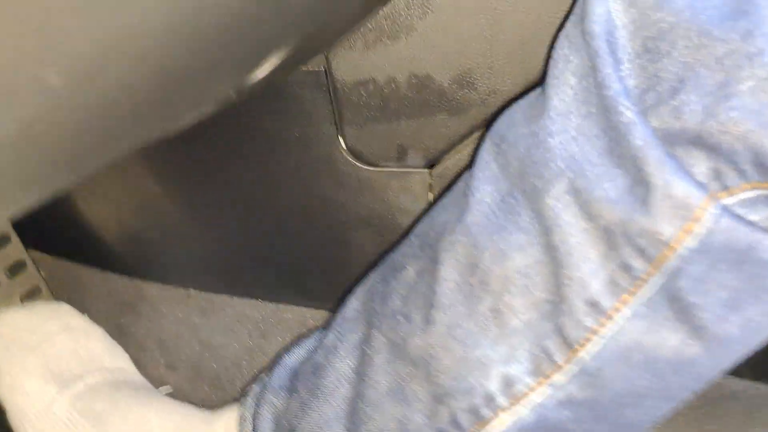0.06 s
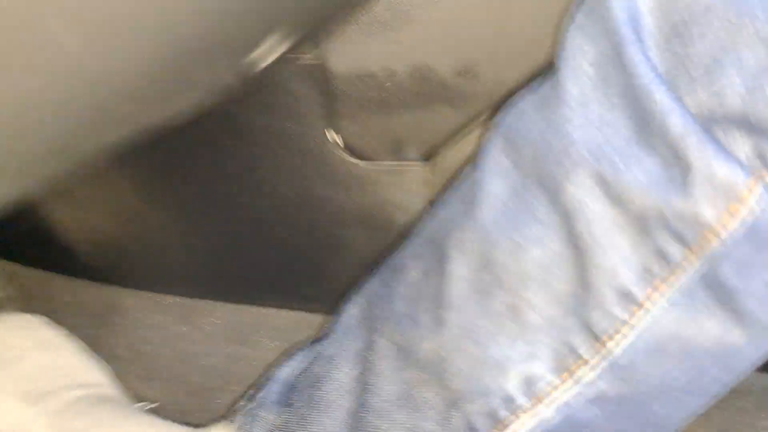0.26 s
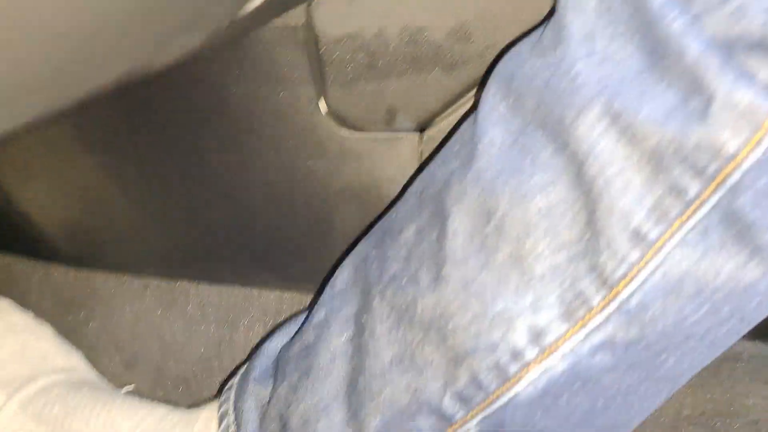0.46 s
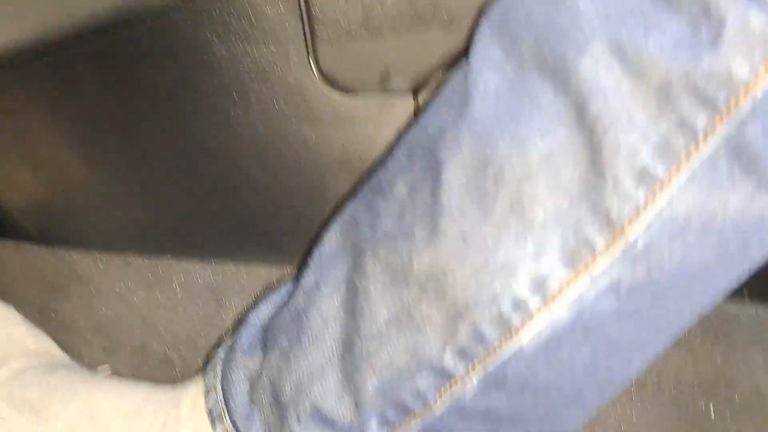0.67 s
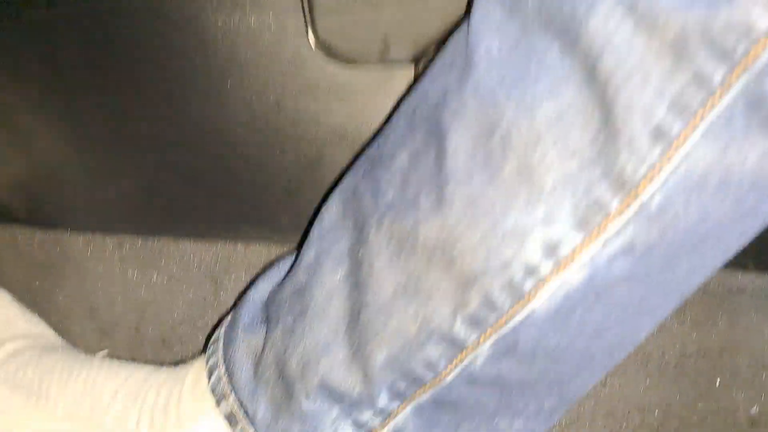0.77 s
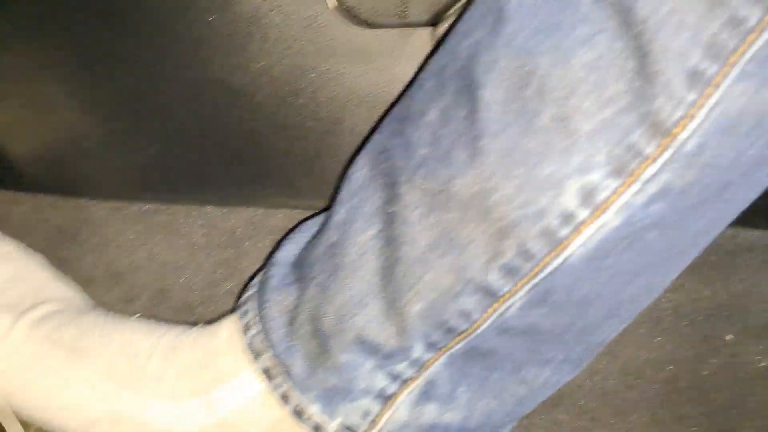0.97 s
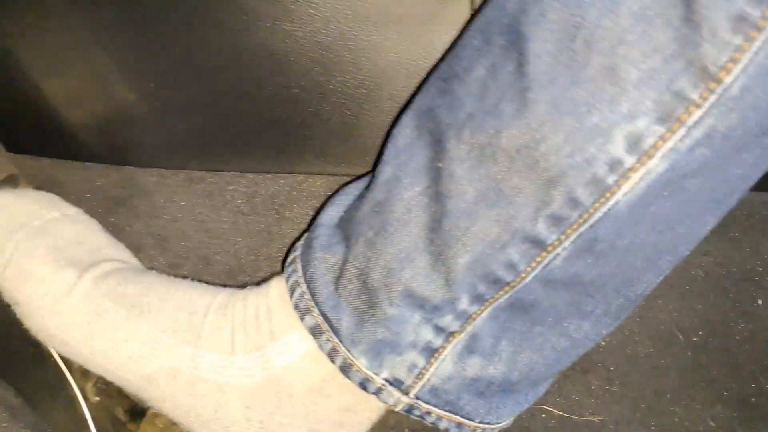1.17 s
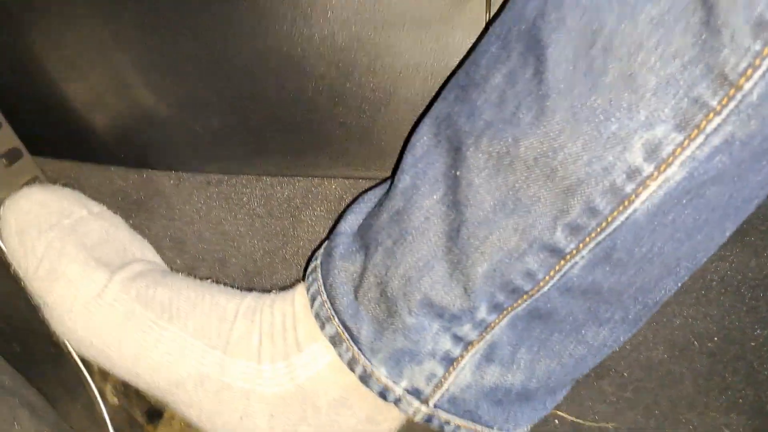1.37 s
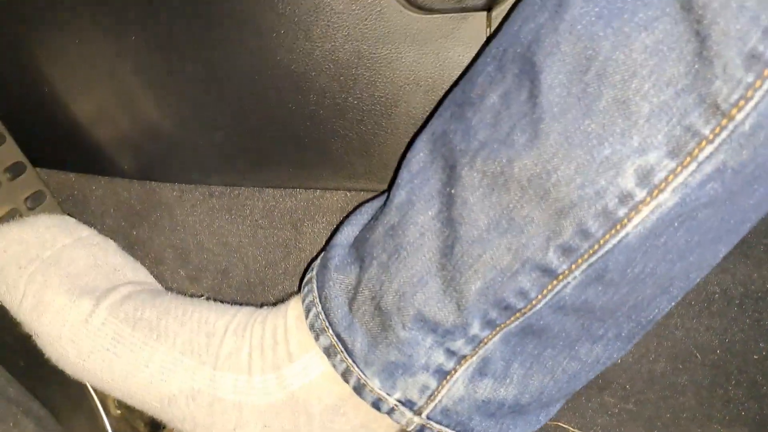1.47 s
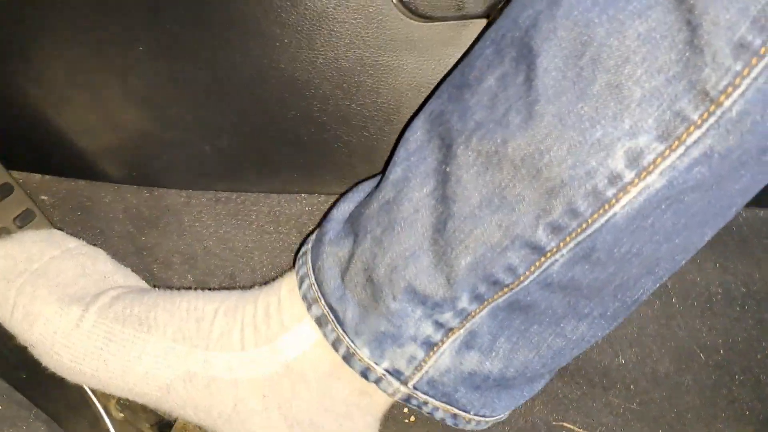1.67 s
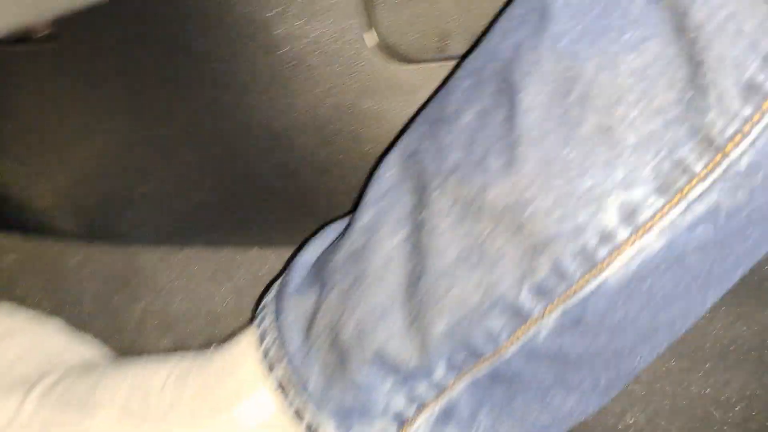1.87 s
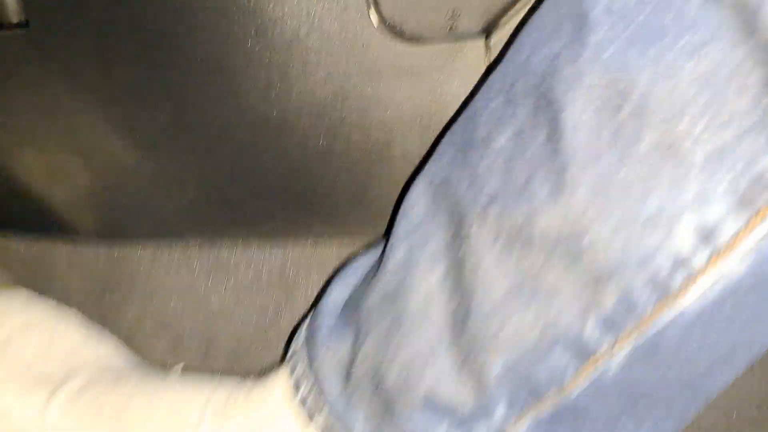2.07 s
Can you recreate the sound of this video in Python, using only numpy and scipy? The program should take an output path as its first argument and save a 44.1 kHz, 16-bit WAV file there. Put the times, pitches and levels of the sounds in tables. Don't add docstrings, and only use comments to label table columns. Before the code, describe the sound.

Inside a small closed car, a hand-held camera close by catches soft scuffs, a sudden hard case knock, foot thumps, a stuttering rub over a ribbed pedal, one bright click, then three low thuds.

```python
import sys
import numpy as np
from scipy import signal
from scipy.fft import rfft, irfft, next_fast_len
from scipy.io import wavfile
from scipy.ndimage import uniform_filter1d, map_coordinates

SR = 44100
rng = np.random.default_rng(int(sys.argv[2]) if len(sys.argv) > 2 else 0)


def nominal_scale(level):
    x = np.asarray(level, float) / 20
    return 10 ** x


def digitize_waveform(pressure):
    field = np.atleast_2d(pressure).T
    bounded = np.clip(field, -1, 1)
    quanta = np.round(bounded * 32767).astype(np.int16)
    wavfile.write(sys.argv[1], SR, quanta)


N = 92610

# frequency in Hz, level in dB.
SOCK_TONE = [(500, -5.5), (1500, -1.5), (3000, -2), (6000, -3.5), (7000, -6.5), (8000, -27.5), (15000, -21)]
LEFT_LAG_S, SCATTER_DB = .0005, 1


def along(points, hz):
    f, v = np.transpose(points)
    return np.interp(np.log(hz + 1), np.log(f + 1), v)


def curve(rows):
    return np.interp(np.arange(N) / SR, *np.transpose(rows))


def wobble(rate_hz):
    knots = rng.standard_normal(int(N * rate_hz / SR) + 4)
    return map_coordinates(knots, [np.arange(N) * rate_hz / SR])


def sides(left_over_right_db):
    return nominal_scale(np.minimum(0, np.array([left_over_right_db, -left_over_right_db])))


def noise(tone, alike, side=((1, 0),), grit_db=0):
    grit = nominal_scale(grit_db * np.array([wobble(600), wobble(600)]))
    a, b = rng.standard_normal((2, N)) * grit
    share = np.clip(alike, 0, 1)
    left = share * a + np.sqrt(1 - share ** 2) * b
    m = next_fast_len(N + 8192)
    hz = np.fft.rfftfreq(m, 1 / SR)
    spectra = rfft([left, a], m) * nominal_scale(along(tone, hz))
    out = irfft(spectra * sides(along(side, hz)), m)[:, :N]
    return out / out[1].std()


def strokes(rows, edge):
    t = np.arange(N) / SR
    out = np.zeros((2, N))
    for start_s, rise_s, fall_s, db, lr_db in rows:
        rise = (t - start_s) / rise_s
        fall = 1 - (t - start_s - rise_s) / fall_s
        out += nominal_scale(db) * sides(lr_db)[:, None] * np.clip(np.minimum(rise, fall), 0, 1) ** edge
    return out


def decay(t, t60_s, rise_s):
    return nominal_scale(-60 * t / t60_s) * (1 - np.exp(-(t / rise_s) ** 2))


def ring(hz, t60_s, rise_s, after_s=0.):
    t = np.maximum(np.arange(SR // 2) / SR - after_s, 0)
    return np.sin(2 * np.pi * hz * t) * decay(t, t60_s, rise_s)


def push(swing_s, slows, t60_s, after_s=0., rise_s=.0001):
    t = np.maximum(np.arange(SR // 2) / SR - after_s, 0)
    half_turns = np.log(1 + t * (slows - 1) / swing_s) / np.log(slows)
    return np.sin(np.pi * half_turns) * decay(t, t60_s, rise_s)


def add(track, s, sound):
    i = round(s * SR)
    track[:, i:i + sound.shape[1]] += sound


def shaking():
    # time in seconds, level in dB.
    motion = [(0, -69), (.06, -60.5), (.14, -57.5), (.3, -50), (.5, -57), (.62, -53), (.8, -55.5),
              (1, -54.5), (1.2, -59), (1.3, -63.5), (1.4, -69), (1.47, -69), (1.55, -62), (1.7, -62),
              (1.77, -61), (1.87, -54.5), (2, -55), (2.1, -51.5)]
    # frequency in Hz, level in dB.
    motion_tone = [(20, -41), (40, 5), (70, 2), (110, -7.5), (250, -15), (500, -30), (1200, -48)]
    return nominal_scale(curve(motion) + 7.0 + 2.5 * wobble(16)) * noise(motion_tone, 0.59)


def foot():
    # start, rise and fall in seconds, level in dB, left over right in dB.
    drag_rows = [(.265, .02, 0.11, -49.5, 6), (.37, 0.037, 0.054, -63.5, 3), (.06, 0.015, .07, -52.5, 2),
                 (.13, 0.038, .04, -53, 5), (.46, .03, 0.091, -51.5, -8), (.51, 0.012, 0.089, -47.5, -9),
                 (1.48, 0.022, 0.051, -62.5, 1), (2.0, 0.027, 0.064, -57, -10)]
    # frequency in Hz, level in dB.
    drag_tone = [(60, -16), (130, 2.5), (250, -2.5), (450, -9), (800, -22), (1500, -35), (3000, -51)]
    # start, rise and fall in seconds, level in dB, left over right in dB.
    sock_rows = [(0.23, 0.49, 0.14, -50.5, 0.5), (1.372, 0.11, 0.29, -55.5, -37),
                 (1.896, 0.16, 0.17, -55, 14), (1.165, 0.028, 0.21, -55, -19),
                 (0.67, 0.0654, 0.094, -73, 0), (0.084, 0.2, 0.25, -60, -3)]
    # start, rise and fall in seconds, level in dB, left over right in dB.
    scuff_rows = [(1.0, 0.025, 0.18, -44, -5), (1.1, 0.06, 0.046, -43, -9.5),
                  (1.17, 0.062, 0.059, -52, -20), (.48, .05, 0.12, -54.5, 1), (.58, 0.072, 0.21, -48.5, -1),
                  (1.98, 0.034, 0.11, -56, -8)]
    # frequency in Hz, level in dB.
    scuff_tone = [(120, -2), (300, -2), (700, -3.5), (1100, 0.5), (1500, -7), (2200, -6.5), (2700, -15.5),
                  (8000, -39)]
    drag = strokes(drag_rows, 1.44) * nominal_scale(2.6 * wobble(69.76)) * noise(drag_tone, 0.58, grit_db=5.5)
    sock = strokes(sock_rows, 1.0) * nominal_scale(SCATTER_DB * wobble(33)) * noise(SOCK_TONE, 0.063, grit_db=1.0)
    scuff = strokes(scuff_rows, 0.96) * nominal_scale(1.97 * wobble(45.84)) * noise(scuff_tone, 0.071, grit_db=2)
    return drag + sock + scuff


def thumps():
    # time in seconds, panel, sharp edge and cabin boom levels in dB, left over right in dB.
    thump_rows = [(.068, -43, -51, -35, 5), (0.344, -41, -47, -53, -13), (0.481, -33.5, -60, -38, -9),
                  (0.521, -41, -40, -38, -1), (0.546, -36, -52, -59, -15), (0.6802, -18, -33, -33.5, -9.5),
                  (1.137, -46, -42, -36, -16), (1.188, -34.5, -62, -41, -3.5),
                  (1.496, -55.5, -66, -39.5, 9), (1.61, -44, -69, -45, -9), (1.6458, -27.5, -33.5, -34, -6),
                  (1.7926, -20, -38, -24, -8), (1.818, -65, -37, -63, -36), (1.908, -20, -37.5, -27.5, -6),
                  (2.011, -38, -62, -48, -6), (2.029, -39, -50, -51, -6), (2.046, -47, -63, -55, -17),
                  (2.087, -44, -60, -57, -16)]
    # frequency in Hz, level in dB, t60 in seconds.
    panel_modes = [(254, -1.5, .045), (312, -5.5, 0.024), (440, -13, 0.028)]
    # frequency in Hz, level in dB, t60 in seconds.
    edge_modes = [(1040, 1, 0.016), (1490, -2, 0.013), (1710, -9, 0.0076), (3100, -8, 0.007)]

    def struck(modes, db, rise_s, chance, lag_s):
        return sum(nominal_scale(db + mode_db + SCATTER_DB * z) * ring(hz * (1 + 0.052 * z), t60_s, rise_s, lag_s)
                   for (hz, mode_db, t60_s), z in zip(modes, chance))

    out = np.zeros((2, N + SR))
    for s, panel_db, edge_db, boom_db, lr_db in thump_rows:
        c = rng.standard_normal(8)
        ports = [struck(panel_modes, panel_db, .0022, c, lag_s) + struck(edge_modes, edge_db, .00045, c[3:], lag_s)
                 for lag_s in (LEFT_LAG_S, 0)]
        boom = nominal_scale(boom_db + 10) * ring(79.3 * (1 + 0.012 * c[7]), .1, .016, 0.0026)
        add(out, s, sides(lr_db)[:, None] * ports - boom)
    return out[:, :N]


def shell():
    # frequency in Hz, level in dB, t60 in seconds.
    shell_modes = [(2300, -5, .0016), (3900, -1, .0022), (5500, -5, .002), (6450, -3, .003),
                   (10600, -24, .003)]
    return sum(nominal_scale(db) * ring(hz, t60_s, .00009) for hz, db, t60_s in shell_modes)


def bump():
    out = np.zeros((2, N + SR))
    kick = uniform_filter1d(push(.0007, 2.7, .024), size=7, mode='constant')
    add(out, .2225, nominal_scale(2.2) * sides(26)[:, None] * (kick + nominal_scale(-20) * shell()))
    side = sides(10.5)[:, None]
    add(out, .2235, nominal_scale(-8) * side * ring(65.4, 0.35, 0.016))
    add(out, .2522, nominal_scale(-10.5) * side * ring(65.4, 0.065, 0.00164))
    return out[:, :N]


def knocks():
    # time in seconds, peak in dB, t60 in seconds, polarity, snap in dB.
    knock_rows = [(.2232, -24, .006, -1, -16), (.2275, -26, .006, -1, -14), (.2309, -15, .006, -1, -16),
                  (.2378, -26, .006, 1, -25), (.2404, -2, .005, -1, -13), (2.0458, -25.5, .008, 1, -40)]
    hits = [(s, db, push(.0004, 1.15, t60_s), way, snap_db) for s, db, t60_s, way, snap_db in knock_rows]
    hits.append((1.31167, -6, push(.0003, 3.2, .0048), 1, -5))
    out, snap = np.zeros((2, N + SR)), shell()
    case = nominal_scale(-12) * ring(1100, .013, .0005)
    for s, db, kick, way, snap_db in hits:
        kick = way * (uniform_filter1d(kick, size=5, origin=2, mode='constant') + case)
        add(out, s, nominal_scale(db) * (kick + way * nominal_scale(snap_db) * snap) * [[0], [1]])
        far = uniform_filter1d(kick, size=12)
        add(out, s + 0.00105, nominal_scale(db - 21.5) * far * [[1], [0]])
    return out[:, :N]


def rattle():
    # start, rise and fall in seconds, level in dB, left over right in dB.
    buzz_rows = [(.2232, .002, .034, -31, 20)]
    # frequency in Hz, level in dB.
    buzz_tone = [(150, 1.5), (400, -1.5), (1200, -10), (3000, -12), (7000, -23), (9000, -30.5),
                 (15000, -38.5)]
    # start, rise and fall in seconds, level in dB, left over right in dB.
    puff_rows = [(.293, .01, .021, -47, -16)]
    buzz = nominal_scale(6.0) * strokes(buzz_rows, 0.033) * noise(buzz_tone, 0.23, grit_db=0.5)
    return buzz + nominal_scale(4.5) * strokes(puff_rows, 0.4) * noise(SOCK_TONE, 0.23)


def bounces():
    # time in seconds, peak in dB, first swing in seconds.
    bounce_rows = [(0.2253, -25, 0.00021), (.2297, -17, 0.00051), (0.235, -28.5, 0.00021),
                   (0.2413, -15, 0.00034), (0.2518, -28.5, 0.00024), (0.257, -23.5, 0.00021)]
    out = np.zeros((2, N + SR))
    for s, db, swing_s in bounce_rows:
        add(out, s, nominal_scale(db) * push(swing_s, 1.3, 0.0098) * [[1], [0]])
    return out[:, :N]


def cloth():
    # time in seconds, level in dB.
    pressure = [(0, -89), (.1, -82.5), (.25, -87), (.33, -69), (.47, -65), (.56, -54), (.8, -52),
                (.92, -54.5), (1.17, -63), (1.3, -85), (1.38, -91.5), (1.5, -74.5), (1.6, -87),
                (1.72, -102), (1.81, -63), (1.9, -57.5), (1.98, -59), (2.1, -60.5)]
    # frequency in Hz, level in dB per Hz.
    cloth_tone = [(250, -30.5), (500, -1), (1200, -6), (6300, 0), (7600, -9.5), (9600, -8.5), (12000, 1),
                  (15800, -9)]
    # frequency in Hz, left over right in dB.
    cloth_side = [(300, -2.5), (2400, -19.5), (6000, -16.5), (15000, -23)]
    level = nominal_scale(curve(pressure) + 13.0 + 0.27 * wobble(21))
    return level * noise(cloth_tone, 0.27, cloth_side, grit_db=1.33)


def judder():
    # time in seconds, level in dB, ring in dB, left over right in dB, plate pitch in Hz.
    slip_rows = [(0.8541, -31, -3.5, -6.5, 610), (.878, -25, -1, -6, 746), (0.9068, -25.5, 3.5, -3.5, 750),
                 (0.94, -21.5, -2, -7, 616), (0.9746, -27, 2.5, -5.5, 590), (1.009, -23, 0.5, -6.5, 1150),
                 (.464, -43.5, 0, -4, 400), (.484, -40, 2, -4, 408), (.5205, -32.5, 1.5, -7, 485),
                 (0.5456, -36.5, -2.5, -6, 404), (2.012, -39.5, -3, -9, 330), (2.028, -38.5, 2, -5, 420),
                 (2.084, -39, 1.5, -8, 327)]
    # frequency in Hz, level in dB, t60 in seconds.
    rib_modes = [(248, -9.5, 0.044), (1282, -7, 0.017), (1446, -8, 0.017)]

    def slip(modes, ring_db, chance, lag_s):
        kick = push(.00055 * (1 + 0.13 * chance[-1]), 2.1, .02, lag_s, .00025)
        return kick - sum(nominal_scale(ring_db + mode_db + SCATTER_DB * z) * ring(hz * (1 + 0.02 * z), t60_s, .0009, lag_s)
                          for (hz, mode_db, t60_s), z in zip(modes, chance))

    out = np.zeros((2, N + SR))
    for s, db, ring_db, lr_db, plate_hz in slip_rows:
        modes = rib_modes + [(plate_hz, -0.5, 0.02)]
        chance = rng.standard_normal(len(modes) + 1)
        ports = [slip(modes, ring_db, chance, lag_s) for lag_s in (LEFT_LAG_S, 0)]
        add(out, s, nominal_scale(db) * sides(lr_db)[:, None] * ports)
    return out[:, :N]


def creak():
    # start, rise and fall in seconds, level in dB, left over right in dB.
    creak_rows = [(1.275, .025, .012, -56, -14), (1.313, .003, .032, -45, -16),
                  (1.335, .005, .014, -52, -12)]
    # frequency in Hz, level in dB.
    creak_tone = [(150, -4), (400, -7), (1000, -3.5), (1500, -15), (2200, -23.5), (7000, -43),
                  (8000, -38.5)]
    return nominal_scale(4.5) * strokes(creak_rows, 0.63) * noise(creak_tone, 0.12, grit_db=1.8)


def scene():
    handling = shaking() + bump() + knocks() + rattle() + bounces() + creak()
    return handling + foot() + thumps() + cloth() + judder()


def low_pass(x):
    return signal.sosfilt(signal.butter(12, 16800, fs=SR, output="sos"), x)


def record(dry):
    # time in seconds, hiss gain in dB.
    gate = [(0, 1.5), (.07, 4), (.1, 7), (.2, 7.5), (.212, 9), (.225, 6.5), (1.3, 9), (1.345, 3.5),
            (1.352, 3.5), (1.414, -1.5), (1.422, -0.5), (1.5, -2.5), (1.62, 3.5), (1.71, -1), (1.77, 10),
            (2.1, 1)]
    # frequency in Hz, level in dB per Hz.
    hiss_tone = [(100, -3), (350, -9), (1000, -4.5), (3400, -11.5), (6500, -11), (7500, -22.5),
                 (12000, -27), (15800, -41)]
    x = dry + nominal_scale(-67.5 + curve(gate)) * noise([(20, -31)] + hiss_tone, 0.047)
    bass_cut_hz, top_hz = 30, 15950
    m = next_fast_len(N + 8192)
    hz = np.fft.rfftfreq(m, 1 / SR)
    response = (1j * hz / (1j * hz + bass_cut_hz)) ** 3 * (hz < top_hz)
    mix = irfft(rfft(x, m) * response, m)[:, :N]
    return low_pass(mix)


dry = scene()
out = record(dry)
digitize_waveform(out)
```